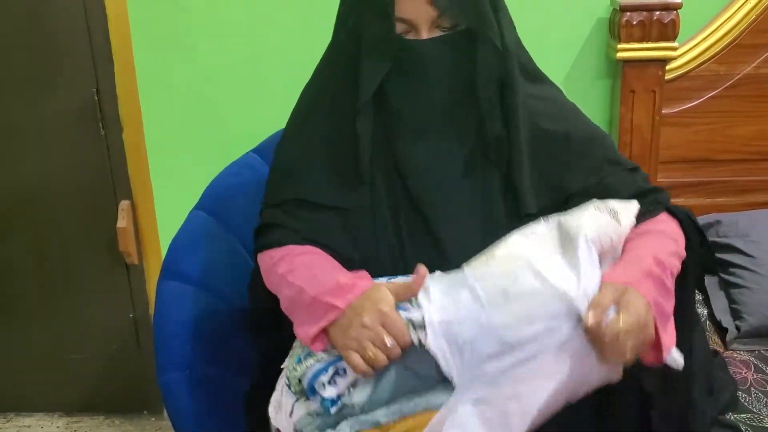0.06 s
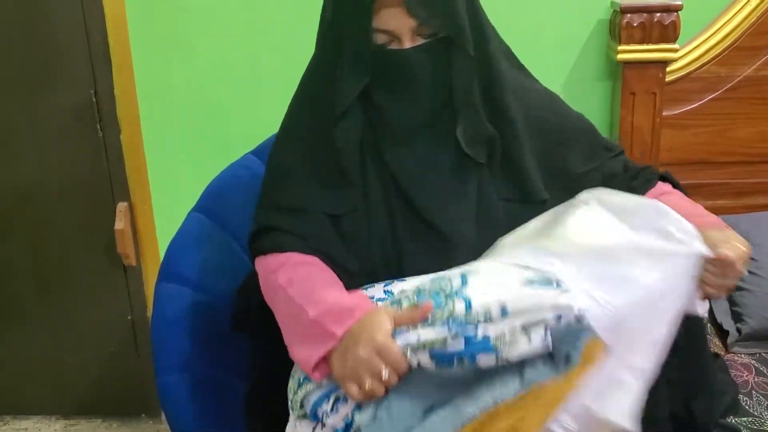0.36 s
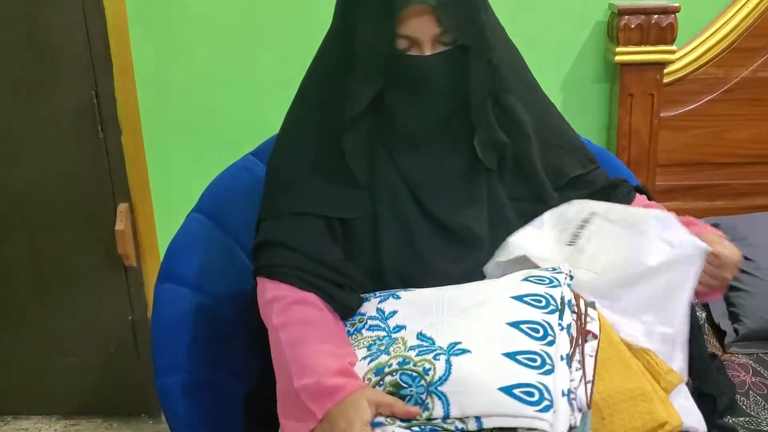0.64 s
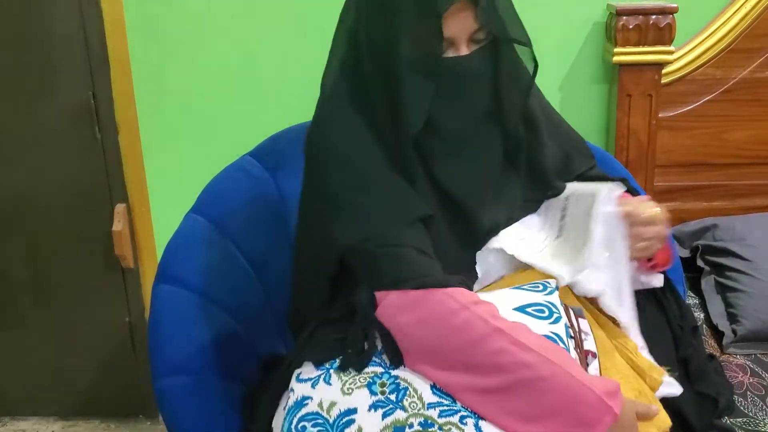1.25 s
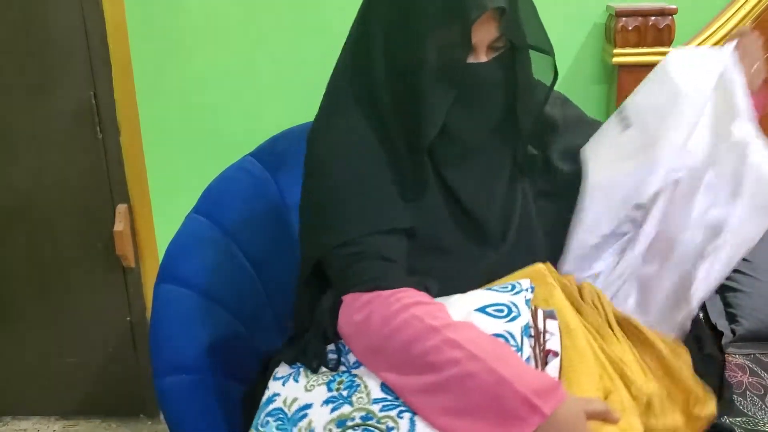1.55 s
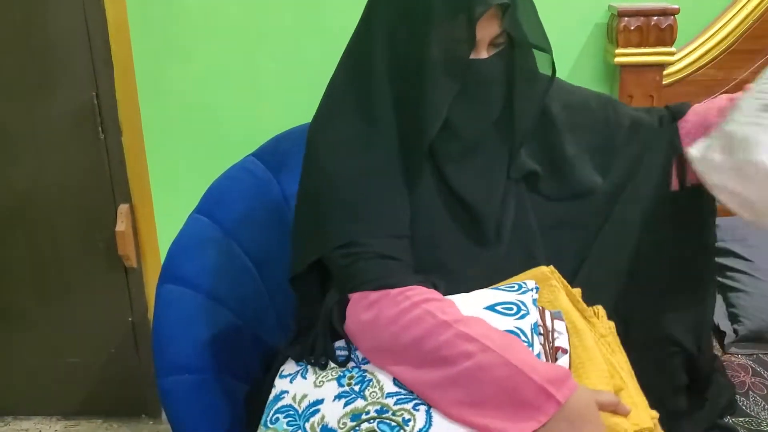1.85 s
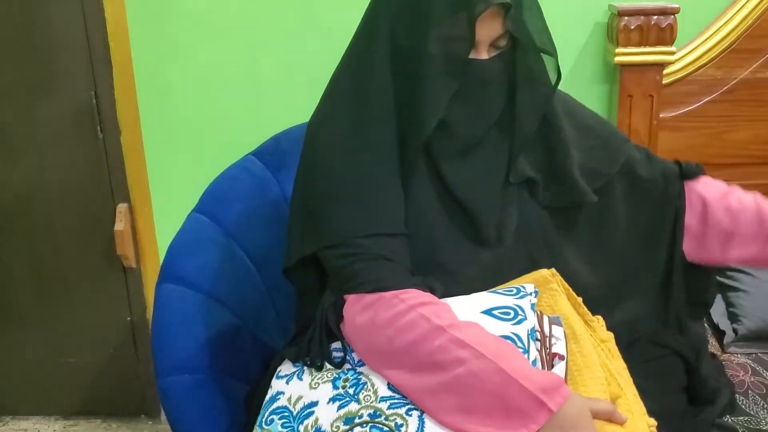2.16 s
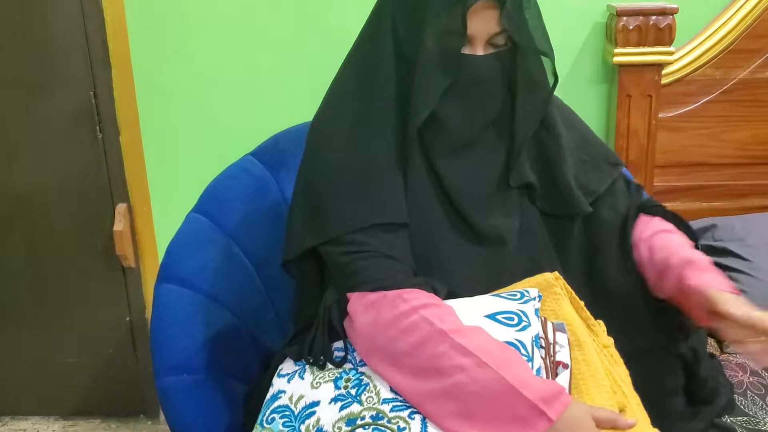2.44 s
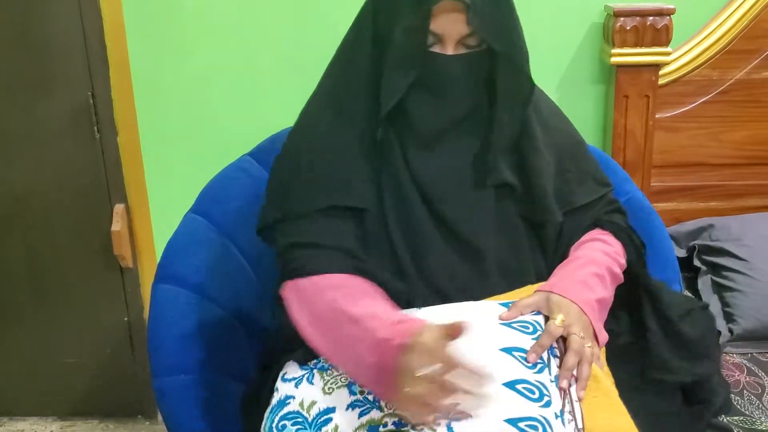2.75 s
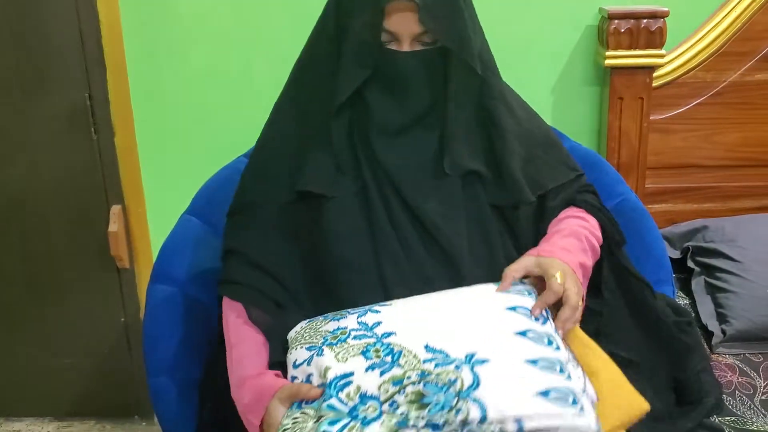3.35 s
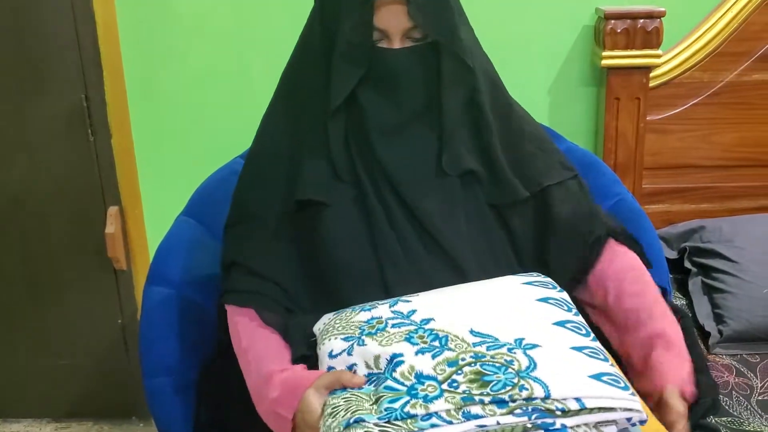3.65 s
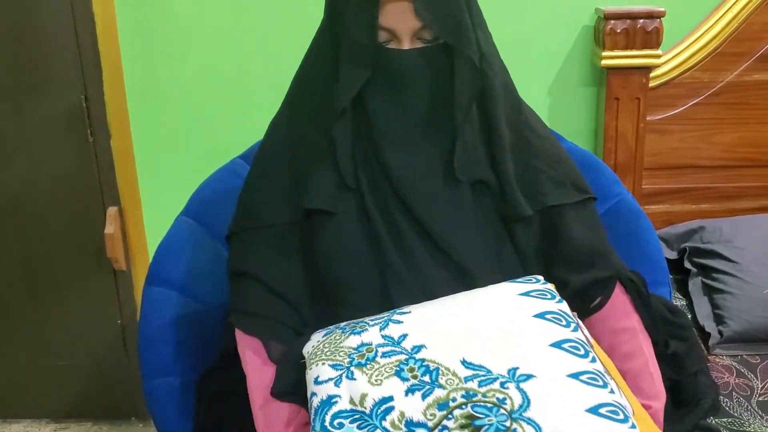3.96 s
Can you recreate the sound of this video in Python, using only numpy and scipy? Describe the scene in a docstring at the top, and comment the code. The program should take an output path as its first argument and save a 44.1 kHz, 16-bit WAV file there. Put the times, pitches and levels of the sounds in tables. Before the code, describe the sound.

A thin plastic bag crinkles as it is pulled off fabric and tossed aside.

```python
"""A small, quiet room: a thin plastic bag is dragged off folded fabric, shaken free and tossed right.
The film rustles in countless tiny buckles, single creases snap, and one panel pops inside out.
The loose sheet flaps and pushes air, then lands with a soft puff.
Afterwards hands shift and brush the fabric, over a faint room tone."""
import sys
import numpy as np
from scipy import signal
from scipy.fft import rfft, irfft, next_fast_len
from scipy.io import wavfile

SR = 44100
rng = np.random.default_rng(int(sys.argv[2]) if len(sys.argv) > 2 else 0)


def dump_mix(stems):
    """Bounce the given channels to the path in sys.argv[1] as a 16-bit WAV at rate SR."""
    frames = np.atleast_2d(stems).T  # one column per channel
    limited = np.clip(frames, -1, 1)  # hard clip at full scale
    pcm = np.round(limited * 32767).astype(np.int16)
    wavfile.write(sys.argv[1], SR, pcm)


N = 176400

# how alike left and right are in the room's diffuse sound: frequency_hz, correlation
ROOM_CORRELATION = [(100, 0.95), (280, 0.99), (550, 0.74), (1000, -0.044), (2000, -0.048), (15000, -0.1)]


def amp(db):
    """Decibels to gain."""
    return 10 ** (np.asarray(db) / 20)


def unit(x):
    """Scale to rms 1."""
    return x / np.sqrt(np.mean(x ** 2) + 1e-20)


def along(points, hz):
    """Read a curve of (frequency_hz, value) points on a log axis."""
    frequencies, values = np.transpose(points)
    return np.interp(np.log(hz + 1), np.log(frequencies + 1), values)


def bell(hz, centre_hz, octaves):
    """A bell-shaped band on a log axis."""
    return np.exp(-.5 * (np.log2((hz + 1) / centre_hz) / octaves) ** 2)


def decay(t, t60_s):
    """An envelope that falls 60 dB in t60_s."""
    return np.exp(-np.log(1000) * t / t60_s)


def envelopes(rows):
    """A gain curve for each level column, fading to silence 0.1 s outside the rows."""
    times, *columns = np.transpose(rows)
    times = np.r_[times[0] - .1, times, times[-1] + .1]
    return [amp(np.interp(np.arange(N) / SR, times, np.r_[-100, db, -100])) for db in columns]


def add(track, sound, index):
    """Mix a sound in from a sample on."""
    part = track[..., index:index + sound.shape[-1]]
    part += sound[..., :part.shape[-1]]


def filtered(x, response):
    """Filter x by a complex response of frequency."""
    size = next_fast_len(N + SR // 2)
    return irfft(rfft(x, size) * response(np.fft.rfftfreq(size, 1 / SR)), size)[..., :N]


def pan(right_db):
    """Left and right gains at constant power, right_db apart."""
    return amp(np.array([[-.5], [.5]]) * right_db) / np.sqrt(np.cosh(np.log(amp(right_db))))


def mid_side(hz):
    """Mid and side gains that give the room's stereo width."""
    angle = np.arccos(along(ROOM_CORRELATION, hz)) / 2
    return np.array([np.cos(angle), np.sin(angle)])


def diffuse(spectrum):
    """Stereo noise from all around: alike in the bass, unrelated in the treble."""
    noise = rng.standard_normal((2, N))
    mid, side = filtered(noise, lambda hz: amp(along(spectrum, hz)) * mid_side(hz))
    return unit(np.array([mid + side, mid - side]))


def reverb(x, tail_count=12):
    """The room's reverberation, crossfading from tail to tail as the bag moves."""
    # the room's decay time: frequency_hz, t60_s
    decay_times = [(100, 0.22), (500, 0.27), (3000, 0.28), (8000, 0.096), (15000, 0.42)]
    out, predelay = np.zeros((2, N)), SR // 400
    for k in range(tail_count):
        hz, t, bands = signal.stft(rng.standard_normal((2, SR // 3)), SR, nperseg=256)
        bands = bands * mid_side(hz)[..., None] * decay(t, along(decay_times, hz)[:, None])
        mid, side = signal.istft(bands, SR, nperseg=256)[1]
        tail = np.pad([mid + side, mid - side], ((0, 0), (predelay, 0))) / np.linalg.norm([mid, side])
        fade = np.clip(1 - abs(np.linspace(0, tail_count - 1, N) - k), 0, 1)
        active = np.flatnonzero(fade)
        add(out, signal.fftconvolve((x * np.sqrt(fade))[None, active], tail, axes=1), active[0])
    return out


def on_right(x, wet_db, lag_s=0.0001355):
    """A source on the right reaches that microphone louder and earlier, and excites the room."""
    # the nearer microphone's advantage: frequency_hz, right_over_left_db
    balance = [(100, 4.7), (300, 0.1), (600, 1.5), (1000, 3), (2000, 6), (4500, 10.5), (8000, 3.5),
               (12000, 2)]
    x = np.broadcast_to(x, (2, N))
    lead_s = np.array([[-.5], [.5]]) * lag_s
    direct = filtered(x, lambda hz: pan(along(balance, hz)) * np.exp(2j * np.pi * hz * lead_s))
    return (direct + amp(wet_db) * reverb(x[1])) / np.hypot(1, amp(wet_db))


def room_tone(level_db=-69.5):
    """The still room and the microphones' own hiss."""
    # colour of the noise floor: frequency_hz, gain_db
    spectrum = [(15, -42.5), (25, -18), (70, -4.5), (126, -8), (235, -3.5), (291, -15), (392, -8),
                (749, -25.5), (1780, -14), (3490, -27), (4690, -19.5), (7630, -28), (8970, -21.5),
                (13800, -24), (15800, -28.5)]
    # the left microphone hisses more: frequency_hz, left_over_right_db
    hiss_balance = [(100, -6.5), (300, -8), (900, 0), (1800, 10.5), (3200, 1.5), (5500, 2), (8500, 12),
                    (15000, 14.5)]
    return amp(level_db) * filtered(diffuse(spectrum), lambda hz: pan(-along(hiss_balance, hz)))


def buckles(spectrum, per_s, scatter_db, slide_share, centre_hz, log_spread, cycles, size=96):
    """Tiny buckles all over the film, each a damped cycle or two of its own pitch, over sliding noise."""
    facing_db, width_s = 2, .0001  # each buckle faces its own way and has its own left-right lag
    slide = diffuse(spectrum)
    when, strength, pitch, sign, facing, place = rng.random((int(per_s * N / SR), 6)).T
    pitch_hz = centre_hz * np.exp(log_spread * (2 * pitch - 1))
    turns = pitch_hz[:, None] * np.arange(size) / SR
    heights = np.sign(sign - .5) * amp(-scatter_db * np.log(np.maximum(strength, 1 / 150)))
    grains = heights[:, None] * np.cos(2 * np.pi * turns) * np.exp(-2 * turns / cycles)
    trains = []
    for side in (-1, 1):
        starts = np.abs(when * N + side * (place - .5) * width_s * SR).astype(int)
        samples = starts[:, None] + np.arange(size)
        heard = grains * amp(side * facing_db * (2 * facing - 1))[:, None]
        trains.append(np.bincount(samples.ravel(), heard.ravel(), N + size)[:N])
    crackle = unit(filtered(np.array(trains), lambda hz: amp(along(spectrum, hz))))
    return np.sqrt(1 - slide_share) * crackle + np.sqrt(slide_share) * slide


def moving_film():
    """The sheet rustles and fizzes as it buckles; its panels flap, and it billows on fast pulls."""
    # pulling the bag off: time_s, rustle_db, fizz_db, flap_db
    pull = [(0, -33, -46.5, -32), (0.03, -42.5, -50, -44), (0.12, -40.5, -49, -44),
            (0.22, -41.5, -46, -43.5), (0.3, -39, -44, -42.5), (0.36, -39, -44.5, -43.5),
            (0.41, -40, -44.5, -38.5), (0.45, -32.5, -38, -37.5), (0.52, -33.5, -42.5, -32),
            (0.58, -40.1, -47.3, -41.5), (0.65, -46, -54, -48), (0.71, -44.5, -57, -47.7),
            (0.75, -40.5, -50, -41.5), (0.82, -40.5, -50.5, -45), (0.87, -45.5, -54.5, -42.5),
            (0.93, -43.5, -57, -44), (1.02, -53, -82.5, -54.5), (1.06, -44, -53.5, -45.5),
            (1.11, -53.5, -64.5, -53.5), (1.15, -49, -62.5, -51), (1.2, -60, -70.5, -52.5),
            (1.26, -60, -72, -60.5)]
    # shaking it free and swinging it aside: time_s, rustle_db, fizz_db, flap_db
    swing = [(1.28, -51, -52, -50.5), (1.33, -45, -48, -43), (1.44, -45.5, -57.5, -48.5),
             (1.5, -36.5, -42.5, -36), (1.56, -29.5, -42.5, -32.9), (1.62, -41, -51, -37.5),
             (1.69, -40, -57, -41.7), (1.77, -48.5, -58.5, -54), (1.83, -48.5, -69, -52),
             (1.88, -57, -80, -54.5), (1.95, -49.5, -58, -56.8), (2.01, -46.5, -56.5, -51.5),
             (2.07, -42.5, -59, -47.3), (2.14, -46, -54.5, -47.5), (2.2, -44.5, -53, -48),
             (2.27, -48.0, -62, -53.5), (2.315, -61.5, -72, -62)]
    # landing and settling: time_s, rustle_db, fizz_db, flap_db
    landing = [(2.335, -46.5, -63.5, -41), (2.37, -38, -47.5, -39.5), (2.41, -39, -55, -37.5),
               (2.48, -47.5, -65.5, -47.5), (2.56, -55, -76.5, -55.5), (2.61, -70, -87, -67),
               (2.67, -69.5, -77.5, -69.5), (2.8, -68, -78.5, -68), (2.96, -77, -79.5, -79)]
    # colours of the crinkles, finest buckles, panels and whole sheet: frequency_hz, gain_db
    rustle_eq = [(300, -50.5), (900, 0), (1400, -0.5), (2000, -4), (3000, -0.5), (4000, 0), (5200, -3),
                 (6600, -2.5), (8000, -15.5), (11000, -27)]
    fizz_eq = [(4000, -37), (7000, -6.5), (8200, -9.5), (9400, -0.5), (10400, -3), (11700, 1), (13000, -5),
               (15600, -5.5)]
    flap_eq = [(70, -30), (140, -6), (200, -3.5), (270, -2), (430, 1.5), (650, -3), (1050, -3.5),
               (1500, -17.5), (3000, -26)]
    billow_eq = [(90, -30), (150, -6), (200, -1), (270, 1.5), (340, -6.5), (600, -23)]
    rustle_gain, fizz_gain, flap_gain = envelopes(np.vstack([pull, swing, landing]))
    rustle = buckles(rustle_eq, per_s=1700, scatter_db=3.65, slide_share=0.48,
                     centre_hz=3700, log_spread=0.85, cycles=1.6)
    out = on_right(amp(5) * rustle_gain * rustle, wet_db=-4.5)
    fizz = buckles(fizz_eq, per_s=2600, scatter_db=3.6, slide_share=0.086,
                   centre_hz=10700, log_spread=0.7, cycles=2)
    out += on_right(amp(2.5) * fizz_gain * fizz, wet_db=-3)
    flap = buckles(flap_eq, per_s=500, scatter_db=3, slide_share=0.43,
                   centre_hz=527, log_spread=1.17, cycles=1, size=512)
    out += on_right(amp(0.5) * flap_gain * flap, wet_db=-4)
    # the low billow swells faster than the flapping
    billow_gain = amp(-5) * flap_gain.max() * (flap_gain / flap_gain.max()) ** 1.95
    return out + billow_gain * diffuse(billow_eq)


def pushed_air(trim_db=1):
    """The sheet shoves air aside in deep, soft gusts."""
    # swell of the gusts: time_s, level_db
    gusts = [(0.0, -39), (0.07, -57), (0.1, -50), (0.2, -58.5), (0.43, -51.5), (0.44, -43), (0.66, -57.5),
             (0.93, -50), (0.98, -66), (1.09, -57.5), (1.26, -68.5), (1.4, -49), (1.5, -61.5),
             (1.55, -39.5), (1.77, -59), (1.78, -64), (1.91, -47.5), (1.94, -57.5), (2.18, -54.5),
             (2.3, -64), (2.37, -40.5), (2.71, -78), (2.78, -68), (2.95, -74.5)]
    # their bass-heavy colour: frequency_hz, gain_db
    spectrum = [(20, -30.5), (40, -17), (60, -11.5), (78, 1), (100, 0), (120, -2.5), (160, -17),
                (400, -48.5)]
    gain, = envelopes(gusts)
    return amp(trim_db) * gain * diffuse(spectrum)


def crease_snaps(trim_db=0.5, floor_db=-21, flutter_db=-15, right_db=10, size=1024):
    """Each crease flips with one sharp pulse, and the film around it flutters briefly."""
    # creases snapping through, and late faint ticks as hands brush the fabric (2.787 s, 3.766 s): start_s,
    # level_db, centre_hz, width_octaves
    creases = [(0.0441, -15.5, 5460, .9), (0.0533, -11.5, 4430, 0.61), (0.1422, -18, 4940, 0.51),
               (0.1532, -17, 6000, 0.45), (0.2055, -14, 2425, 0.65), (0.2924, -17, 4800, 0.26),
               (0.301, -15.5, 4310, 0.38), (.326, -15, 4260, 0.4), (0.3497, -8, 6600, 0.74),
               (0.469, -16.5, 5020, 0.67), (0.4946, -13.5, 4800, 0.44), (.533, -16.5, 5500, 0.41),
               (.618, -20, 4160, 0.51), (0.6627, -11, 5270, 0.25), (0.7277, -16.5, 5140, 0.27),
               (.748, -9, 6860, 0.69), (0.769, -14.5, 7530, 0.78), (0.7837, -16, 5440, 0.27),
               (0.796, -19, 5900, 0.36), (0.8013, -3.5, 7100, 0.78), (.8165, -17, 6000, 0.7),
               (0.864, -19, 6980, 0.42), (.887, -16, 5030, 0.53), (0.9095, -18.5, 5260, 0.29),
               (0.9364, -11, 10000, .7), (.9843, -26, 3770, .6), (1.0417, -18, 8000, 2),
               (1.074, -23.5, 4900, 0.78), (1.1498, -23, 3000, 1.5), (1.274, -27, 5500, 0.69),
               (1.668, -19.5, 4780, 0.13), (1.722, -22.5, 5400, 0.16), (1.8164, -20.5, 4286, 0.49),
               (1.907, -25, 3550, 0.24), (1.945, -25.5, 5000, .8), (2.0310, -17.5, 4060, 0.54),
               (2.0431, -12, 5860, 0.26), (2.0625, -15, 4200, .6), (2.119, -16, 3710, .5),
               (2.1522, -12, 5800, 0.95), (2.179, -25, 5970, 0.59), (2.2048, -25.5, 4540, 0.42),
               (2.3295, -22, 5020, 0.87), (2.3655, -13, 3720, 0.76), (2.3776, -13.5, 3580, 0.68),
               (2.470, -23.5, 6500, 0.53), (2.554, -28, 3370, 0.34), (2.787, -39, 3400, .6),
               (3.766, -53, 4000, 0.9)]
    out, t, hz = np.zeros((2, N)), np.arange(size) / SR, np.fft.rfftfreq(size, 1 / SR)
    for start_s, level_db, centre_hz, octaves in creases:
        spectrum = bell(hz, centre_hz, octaves) + amp(floor_db)
        # minimum phase packs the energy into the attack
        cepstrum = irfft(np.log(spectrum))
        folded = np.r_[cepstrum[0], 2 * cepstrum[1:size // 2]]
        pulse = irfft(np.exp(rfft(folded, size)))
        flutter = amp(flutter_db) * rng.standard_normal((2, size)) * decay(t, t60_s=0.0074)
        flutter[:, 0] = amp(-right_db), 1  # the pulse itself: gripped creases lie further right
        snap = signal.fftconvolve(pulse[None] / abs(pulse).max(), flutter, axes=1)
        add(out, amp(level_db + trim_db) * snap, round(start_s * SR))
    return on_right(out, wet_db=-5.5)


def panel_pop(start_s=.8085, level_db=-18, pitch_hz=1050, rise_s=0.00085):
    """A panel of the bag turns inside out with a short hollow note."""
    out, t = np.zeros(N), np.arange(2048) / SR
    ring = np.sin(2 * np.pi * pitch_hz * t) * (1 - np.exp(-t / rise_s)) * decay(t, t60_s=0.015)
    add(out, amp(level_db) * ring, round(start_s * SR))
    return on_right(out, wet_db=-3)


def scuffs(rise_s=.005, fall_s=0.014, size=8192):
    """Brief slips, each a quick swell of friction noise in its own band."""
    # slips of film and cloth: start_s, level_db, centre_hz, width_octaves
    slips = [(1.903, -38.5, 3460, 0.13), (2.550, -45.5, 3400, 0.17), (2.788, -49, 2870, 0.2),
             (3.440, -62.5, 450, 1), (3.768, -58.5, 700, 1.5), (3.946, -62.5, 5070, .5)]
    out, t, hz = np.zeros(N), np.arange(size) / SR, np.fft.rfftfreq(size, 1 / SR)
    swell = (1 - np.exp(-t / rise_s)) * np.exp(-t / fall_s)
    for start_s, level_db, centre_hz, octaves in slips:
        friction = unit(irfft(rfft(rng.standard_normal(size)) * bell(hz, centre_hz, octaves)))
        add(out, amp(level_db) * friction * swell, round(start_s * SR))
    return on_right(out, wet_db=1)


def landing_puff(start_s=2.345, level_db=-36, rise_s=.025, fall_s=0.048):
    """The landing bag collapses and puffs out its air."""
    t = np.maximum(np.arange(N) / SR - start_s, 0)
    puff = unit(filtered(rng.standard_normal(N), lambda hz: bell(hz, centre_hz=460, octaves=.6)))
    swell = (1 - np.exp(-t / rise_s)) * np.exp(-t / fall_s)
    return on_right(amp(level_db) * puff * swell, wet_db=-2)


def fabric(bump_trim_db=0.5, stroke_fade_s=0.016):
    """Hands bump the folded stack dully, and palms brush over it."""
    # hands shifting the stack: time_s, level_db
    handling = [(2.6, -59), (2.688, -91), (2.74, -63), (2.822, -61), (2.992, -82), (3.06, -65),
                (3.402, -83.5), (3.476, -62), (3.672, -66.5), (3.742, -86.5), (3.928, -62.5), (4.0, -66)]
    # palm strokes: start_s, length_s, level_db
    strokes = [(2.653, 0.21, -67), (3.276, 0.31, -76.5), (3.752, 0.39, -72)]
    # colours of the bumps and the brushing: frequency_hz, gain_db
    bump_eq = [(15, -56.5), (25, -40.5), (81, 3), (144, -4), (173, -14), (217, -10.5), (413, -23.5),
               (438, -20), (900, -35), (1170, -68.5), (1980, -120)]
    brush_eq = [(150, -15), (450, 11), (800, -3), (1700, -10.5), (3000, -4), (5500, 0), (8000, -9),
                (15000, -20)]
    bump_gain, = envelopes(handling)
    bumps = amp(bump_trim_db) * bump_gain * diffuse(list(bump_eq) + [(2500, -68)])
    brush_gain, t = np.zeros(N), np.arange(N) / SR
    for start_s, length_s, level_db in strokes:
        inside_s = np.minimum(t - start_s, start_s + length_s - t)
        brush_gain += amp(level_db) * np.clip(inside_s / stroke_fade_s, 0, 1)
    return bumps + brush_gain * diffuse(brush_eq)


def scene():
    """Bag, fabric and the room's faint hiss."""
    bag = moving_film() + pushed_air() + crease_snaps() + panel_pop() + landing_puff()
    return bag + scuffs() + fabric() + room_tone()


def record(dry):
    """The recorder keeps nothing above its band limit."""
    return filtered(dry, lambda hz: hz < 15900)


dry = scene()
out = record(dry)
dump_mix(out)
```